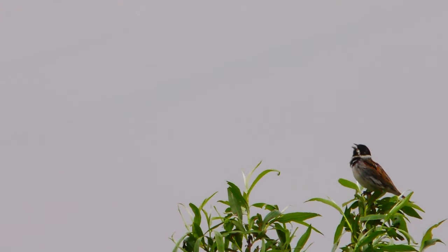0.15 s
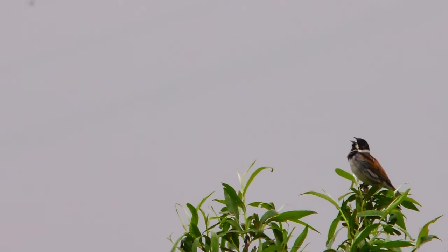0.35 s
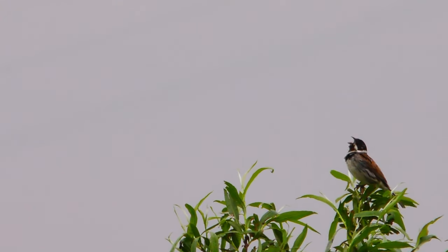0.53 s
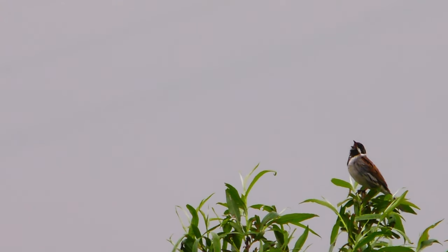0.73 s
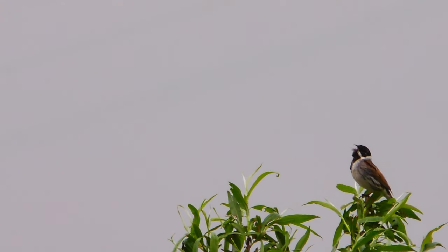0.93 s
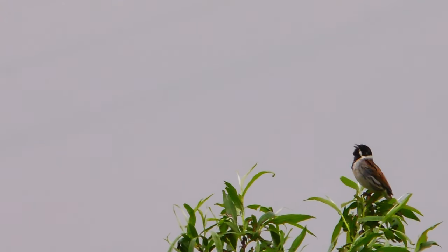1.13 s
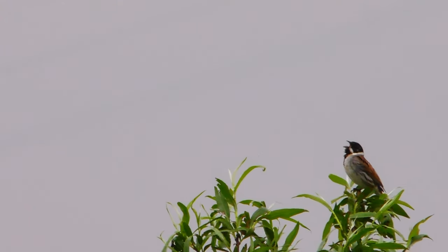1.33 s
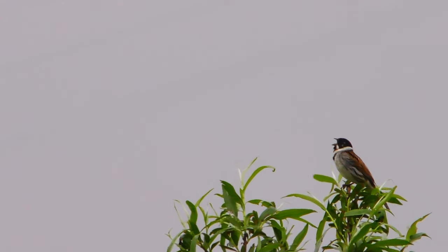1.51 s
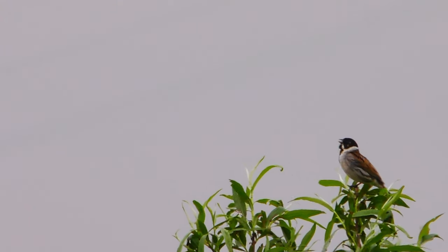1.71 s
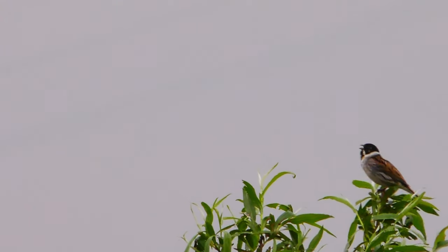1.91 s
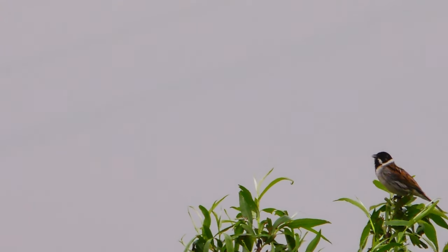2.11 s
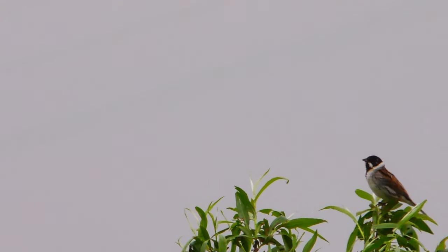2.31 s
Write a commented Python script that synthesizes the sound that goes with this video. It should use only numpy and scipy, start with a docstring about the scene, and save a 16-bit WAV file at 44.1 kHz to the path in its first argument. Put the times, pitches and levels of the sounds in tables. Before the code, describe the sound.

A small bird sings outdoors, opening with four buzzy chirps that grow louder up to 0.9 seconds. A quick two-pitched rattle follows, then a thin whistle at 1.4 seconds, short buzzes, and a softer fading trill from 1.9 seconds. Dull wooden knocks land nearby, doubled at 1.1 seconds and single at 2.2. Underneath are faint hiss, low rumble, another far-off bird and a distant rush swelling around one second.

```python
"""A small bird sings from a bush top: four buzzy chirps, a two-level rattle, a thin whistle, short
buzzes and a fading trill. Each stroke is a whistled tone, roughened by fast swings of pitch and
level and smeared by echoes from the vegetation. Behind it a distant rush swells over a low rumble,
microphone hiss, a faint hum and another bird far off. Three dull knocks on wood land nearby."""
import sys
import numpy as np
from scipy import signal
from scipy.io import wavfile
from scipy.ndimage import uniform_filter1d

SR = 44100
rng = np.random.default_rng(int(sys.argv[2]) if len(sys.argv) > 2 else 0)


def wav_out(sig):
    """Save sig, one row per channel (or a flat mono array), as 16-bit PCM at SR to the path in sys.argv[1]."""
    wavfile.write(sys.argv[1], SR, np.round(np.clip(np.atleast_2d(sig).T, -1, 1) * 32767).astype(np.int16))


N = 103635


def amp(db):
    return 10 ** (np.asarray(db) / 20)


def unit_rms(x):
    return x / np.sqrt(np.mean(x ** 2) + 1e-20)


def curve_at(points, hz):
    f, value = np.transpose(points)
    return np.interp(np.log(hz + 1), np.log(f + 1), value)


def add(mix, start_s, sound):
    part = mix[:, round(start_s * SR):][:, :sound.shape[1]]
    part += sound[:, :part.shape[1]]


def wander(count, span):
    """Random drift, smoothed over about span samples."""
    return unit_rms(signal.fftconvolve(rng.standard_normal(12000), np.hanning(2 * span), "valid"))[:count]


# Stereo image of the noise beds. Each row: frequency in Hz, left-right correlation.
BED_IMAGE = [(30, 0.9), (100, 0.97), (500, 0.91), (1200, 0.82), (3000, 0.13), (7000, -0.44), (15000, 0.023)]

def noise_bed(colour, patchy_db):
    """Coloured stereo noise with drifting louder and softer patches."""
    hz = np.fft.rfftfreq(1024, 1 / SR)
    a, b, c, d, patches = rng.standard_normal((N // 256 + 5, 513, 5)).T
    patches = unit_rms(uniform_filter1d(uniform_filter1d(patches, 8, 0), 10, 1))
    likeness = curve_at(BED_IMAGE, hz)[:, None]
    left = a + 1j * b
    right = likeness * left + np.sqrt(1 - likeness ** 2) * (c + 1j * d)
    spectrum = np.array([left, right]) * amp(curve_at(colour, hz)[:, None] + patchy_db * patches)
    return unit_rms(signal.istft(spectrum, nperseg=1024, noverlap=768)[1][:, :N])


# Tone colours. Each row: frequency in Hz, relative level in dB.
RUSH_COLOUR = [(200, -20), (330, -11), (500, 0), (1000, -3.5), (2000, -7.5), (4000, -8.5), (8000, -16.5),
               (11000, -26), (15000, -64)]
RUMBLE_COLOUR = [(40, -22), (80, -3), (180, 2.5), (260, 0.5), (400, -23)]
# Fader moves. Each row: time in seconds, level in dB.
RUSH_FADER = [(0, -54), (.6, -52), (.85, -54), (1.0, -44), (1.15, -41), (1.45, -44), (1.7, -47),
              (1.95, -47), (2.1, -48.5), (2.35, -53)]
RUMBLE_FADER = [(0, -61.5), (.6, -58), (.9, -63), (1.5, -61.5), (2.35, -63)]

def rush_and_rumble():
    """A far, broad rush and a low rumble swell and ebb."""
    t = np.arange(N) / SR
    return sum(noise_bed(colour, patchy_db=2.0) * amp(np.interp(t, *np.transpose(fader)))
               for colour, fader in ((RUSH_COLOUR, RUSH_FADER), (RUMBLE_COLOUR, RUMBLE_FADER)))


# The hum's glide. Each row: time in seconds, pitch in Hz, level in dB.
HUM_GLIDE = [(0, 470, -70), (.3, 488.4, -64), (0.648, 471.8, -60.5), (.9, 488, -60.5), (1.2, 499.5, -56.5),
             (1.55, 503.6, -56.5), (1.75, 491, -61), (2.05, 474, -85), (2.35, 473, -61.5)]

def hum(width_hz=17.7):
    """A faint, wavering hum far away: a tone blurred by narrow-band noise."""
    times, hz, db = np.transpose(HUM_GLIDE)
    t = np.arange(N) / SR
    pole = np.exp(-np.pi * width_hz / SR)
    noise = rng.standard_normal(N) + 1j * rng.standard_normal(N)
    fuzz = signal.lfilter([1], [1, -2 * pole, pole * pole], noise)
    fuzz /= np.sqrt(np.mean(abs(fuzz) ** 2))
    tone = np.exp(2j * np.pi * np.cumsum(np.interp(t, times, hz)) / SR)
    return amp(np.interp(t, times, db)) * unit_rms(((1.07 + fuzz) * tone).real)


# Colour of the hiss. Each row: frequency in Hz, relative level in dB.
HISS_COLOUR = [(40, -18), (100, -44), (330, -7), (480, -2.5), (634, -2.5), (1550, -9), (4720, -25),
               (6790, -18), (15700, -17.5)]

def hiss(level_db=-52.5):
    """The microphone's noise floor."""
    return amp(level_db) * noise_bed(HISS_COLOUR, patchy_db=1.64)


# Stroke shapes. Each row: time from the syllable's cue in seconds, base pitch in Hz,
# relative level in dB, pitch swing either way in Hz.
CHIRP_LEAD = [(-.021, 5080, -26, 0), (-.011, 5130, -8, 0), (-.005, 5400, -11, 60), (.003, 6400, -22, 250)]
CHIRP_BUZZ = [(0, 3900, -20, 150), (.006, 4650, -5, 40), (.02, 4780, 0, 40), (.027, 4850, -1, 520),
              (.06, 4950, -1, 600), (.08, 4950, -4, 560), (.09, 4950, -26, 500)]
FAR_CHURR = [(0, 3150, -12, 150), (.03, 3200, 0, 200), (.1, 3180, -5.5, 200), (.13, 3050, -26, 150)]
RATTLE_HIGH = [(0, 4300, -9, 218), (.012, 4540, 0, 274), (.028, 4663, 0.5, 330), (.037, 4950, -8, 330)]
RATTLE_LOW = [(.028, 3740, -10, 60), (.04, 3553, -3, 92), (.072, 3470, -2, 90), (.088, 3280, -12, 89)]
RATTLE_BLIPS = [(.037, 2935, -14, 120), (.045, 2910, -12, 118), (.075, 2880, -12.5, 120),
                (.085, 2973, -10, 120)]
WHISTLE_DROP = [(0, 7000, -30, 100), (.004, 6000, -6, 0), (.011, 5450, 0, 0), (.016, 4900, -11, 200),
                (.023, 3900, -15, 250)]
WHISTLE_HOLD = [(.022, 4610, -15, 0), (.036, 5193, -2, 0), (.055, 5222, -3.5, 0.015), (.1, 5230, -2, 0),
                (.117, 5222, -18, 0)]
LOW_BUZZ = [(0, 3300, -13, 80), (.035, 3520, -3.5, 128), (.058, 3402, 1, 160), (.066, 2950, -7.5, 120),
            (.08, 3050, -24, 121.1)]
THIN_LEAD = [(0, 6030, -12, 250), (.008, 6850, -5, 250), (.014, 7200, -4, 250)]
THIN_HOLD = [(.018, 6850, -1, 61), (.04, 6846, 0.5, 80), (.065, 6760, -0.5, 80), (.098, 6850, -3.5, 80),
             (.108, 6830, -16, 79.4)]
RISING_BUZZ = [(0, 3750, -20, 100), (.025, 4123, -1, 232), (.058, 4440, 3.5, 303), (.068, 4570, -9, 420),
               (.076, 4700, -24, 401)]
RISING_TAIL = [(.076, 3168, -18, 150), (.092, 3550, -5.5, 180), (.13, 3626, -9, 130), (.17, 3750, -20, 100),
               (.185, 3670, -24, 102)]
TRILL_UP = [(0, 4380, -8, 200), (.005, 4700, -1.5, 250), (.01, 5164, 0, 250), (.018, 5280, -6, 250)]
TRILL_TIP = [(-.005, 5390, -9, 200), (.002, 5550, 0.5, 200), (.008, 5700, -21, 200)]
TRILL_DOWN = [(.018, 6860, -21, 300), (.024, 5820, -5, 352), (.032, 5060, -0.5, 405),
              (.048, 4820, -12.5, 350), (.062, 4900, -13, 349)]

def stroke(shape, trill_hz, rise, dip, pitch, drift_hz=7.6, full_rasp_swing_hz=302):
    """One whistled tone whose pitch swings up and back each trill cycle, ducking on the way down."""
    times, hz, db, swings = np.transpose(sorted(shape))
    t = np.arange(times[0], times[-1], 1 / SR)
    cycle = np.cumsum(trill_hz * (1 + 0.222 * wander(len(t), span=300))) / SR % 1
    rise = np.clip(rise, .1, .9)
    sweep = np.sin(np.pi / 2 * np.interp(cycle, [0, rise, 1], [-1, 1, -1]))
    swing = np.interp(t, times, swings)
    freq = pitch * np.interp(t, times, hz) + sweep * swing + drift_hz * wander(len(t), span=93)
    pulse = 1 - dip * np.cos(np.pi * (cycle - (1 + rise) / 2)) ** 2
    rasp = 1 + 0.2 * np.minimum(swing / full_rasp_swing_hz, 1) * wander(len(t), span=52)
    fade = np.minimum(np.minimum(t - times[0], times[-1] - t) / 0.0012, 1)
    envelope = fade * pulse * rasp * amp(np.interp(t, times, db))
    return times[0], np.sqrt(2) * envelope * np.sin(2 * np.pi * np.cumsum(freq) / SR)


# Syllables. Each row: stroke shape, trill rate in Hz, rising share of a cycle, dip depth from 0 to 1.
CHIRP = [(CHIRP_LEAD, 130, .6, 0), (CHIRP_BUZZ, 131, 0.532, 0.43)]
FAR = [(FAR_CHURR, 72, 0.56, 0.37)]  # the distant bird
RATTLE = [(RATTLE_HIGH, 170, 0.88, 0.48), (RATTLE_LOW, 140, 0.38, 1), (RATTLE_BLIPS, 70, 0.16, .99)]
WHISTLE = [(WHISTLE_DROP, 255, .6, 0.082), (WHISTLE_HOLD, 100, .6, 0)]
LOW = [(LOW_BUZZ, 170, 0.34, 0.82)]
THIN = [(THIN_LEAD, 190, .6, .3), (THIN_HOLD, 54.8, 0.53, 0.61)]
RISING = [(RISING_BUZZ, 140, 1, 0.52), (RISING_TAIL, 120, 0.77, 0.78)]
TRILL = [(TRILL_UP, 217, .6, .3), (TRILL_TIP, 210, .6, 0.19), (TRILL_DOWN, 191, 0.53, 0.27)]
# The score. Each row: syllable, gain in dB, pitch factor, pan as left minus right in dB.
SONG = [(CHIRP, -36.5, 1.017, 2.7), (CHIRP, -26.5, 1.007, 2.7), (CHIRP, -25.5, 1.008, 2.1),
        (CHIRP, -23.5, 1.001, 2.1), (RATTLE, -26, 1.001, 2.5), (RATTLE, -27, 1.001, 2.9),
        (RATTLE, -27.5, 1.001, 2.1), (RATTLE, -28.5, 1.001, 1.7), (WHISTLE, -25.5, 1.001, 0.45),
        (LOW, -30, 1.001, 0.72), (THIN, -42, 1.001, 0.58), (RISING, -29, 1.001, 1.5),
        (TRILL, -38.5, 1.001, 1.4), (TRILL, -38, 1.001, 1.1), (TRILL, -38.5, 1.03, 0.98),
        (TRILL, -41.5, 1.001, 0.68), (FAR, -58.5, 1.001, .2), (FAR, -62, 1.001, 0.25), (FAR, -71, 0.83, .2),
        (FAR, -57, 0.97, .2)]
# One cue in seconds for each row of the score.
CUES = [.173, .385, .588, .777, .952, 1.034, 1.116, 1.198, 1.366, 1.466, 1.603, 1.71, 1.908, 1.989, 2.075,
        2.185, .22, .35, .5, 1.9]

def birds():
    """The near bird's song and the far bird's churrs, stroke by stroke."""
    out = np.zeros((2, N))
    for cue, (syllable, db, pitch, pan_db) in zip(CUES, SONG):
        for part in syllable:
            offset, tone = stroke(*part, pitch)
            add(out, cue + offset, tone * amp([[db + pan_db / 2], [db - pan_db / 2]]))
    return out


def echoes(song, far_db=1.5, far_t60_s=.31, near_db=-4, near_t60_s=.05, centre=0.65, turn_hz=4.102):
    """Dense scattering from leaves and reeds; three tails take turns as the bird turns its head."""
    t = np.arange(SR // 2) / SR
    turn = np.arange(N) / SR * turn_hz
    out = np.zeros((2, N))
    for k in range(3):
        noise = rng.standard_normal((3, len(t)))
        bright_sides = np.sqrt(1 - centre ** 2) * np.diff(noise[1:], prepend=0)
        scatter = (centre * noise[:1] + bright_sides) * (t > 0.00098)
        far = scatter * np.minimum(t / 0.025, 1) * amp(-60 * t / far_t60_s)
        near = scatter * amp(-60 * t / near_t60_s)  # inside the bush itself
        tail = amp(far_db) * far / np.linalg.norm(far[0]) + amp(near_db) * near / np.linalg.norm(near[0])
        send = np.sqrt(2 / 3) * np.cos(np.pi * (turn + k / 3))
        out += signal.fftconvolve(song * send, tail, axes=1)[:, :N]
    return out


# The hits. Each row: start in seconds, peak level in dB, pitch factor.
KNOCKS = [(1.122, -28.5, 0.88), (1.146, -34.5, 0.8), (2.1565, -27, 1.037)]
# The wood's ring. Each row: base frequency in Hz, relative level in dB, seconds to fall 60 dB.
WOOD_MODES = [(730, 6.5, 0.019), (960, 4, 0.022), (1495, -8, 0.045)]

def knocks(attack_s=0.00153):
    """Dull knocks on wood: three modes that die away fast."""
    out, t = np.zeros((2, N)), np.arange(2500) / SR
    for start, peak_db, pitch in KNOCKS:
        ring = sum(amp(db - 60 * t / t60) * np.sin(2 * np.pi * hz * pitch * t)
                   for hz, db, t60 in WOOD_MODES)
        ring *= -np.minimum(t / attack_s, 1)
        add(out, start, np.tile(amp(peak_db) * ring / abs(ring).max(), (2, 1)))
    return out


def scene():
    """Birdsong and its echoes, with dry knocks, over the background beds."""
    song = birds()
    return song + echoes(song) + knocks() + rush_and_rumble() + hum() + hiss()


def record(dry, low_cut_hz=50, high_cut_hz=15800):
    """The microphone's bass roll-off, then a steep high cut."""
    thinned = signal.sosfilt(signal.butter(2, low_cut_hz, "high", fs=SR, output="sos"), dry)
    high_cut = signal.firwin(1023, high_cut_hz, window=("kaiser", 10), fs=SR)
    return signal.oaconvolve(thinned, high_cut[None], "same")


dry = scene()
out = record(dry)
wav_out(out)
```